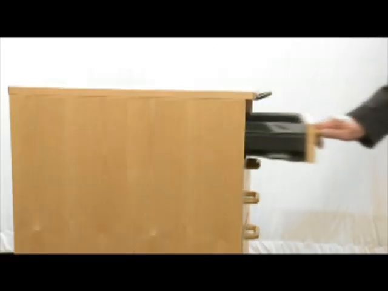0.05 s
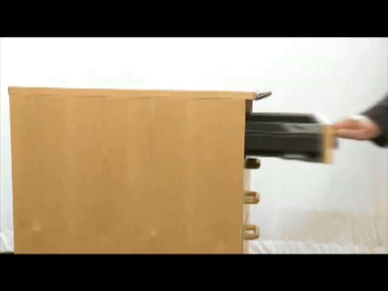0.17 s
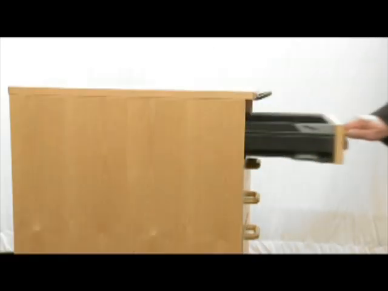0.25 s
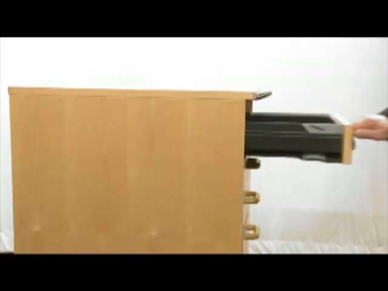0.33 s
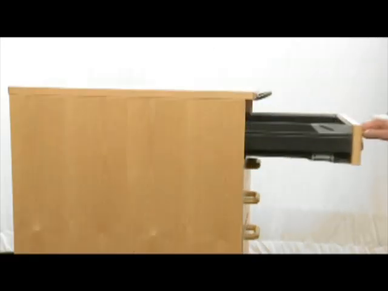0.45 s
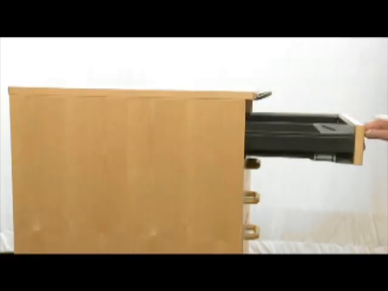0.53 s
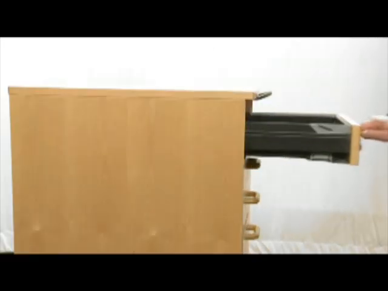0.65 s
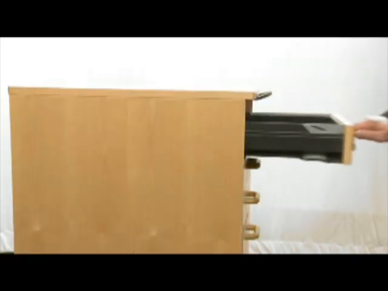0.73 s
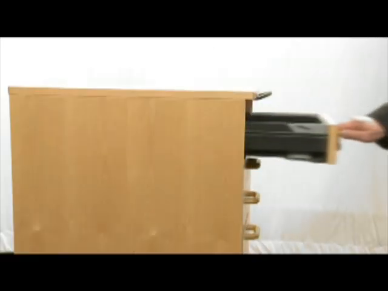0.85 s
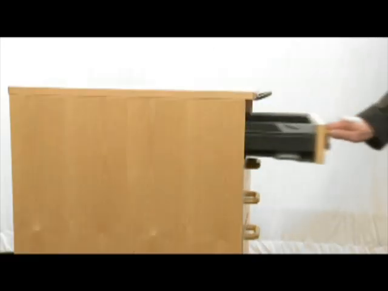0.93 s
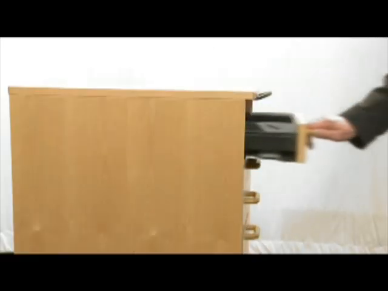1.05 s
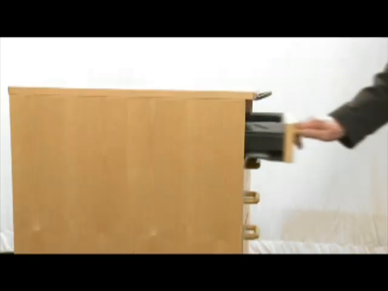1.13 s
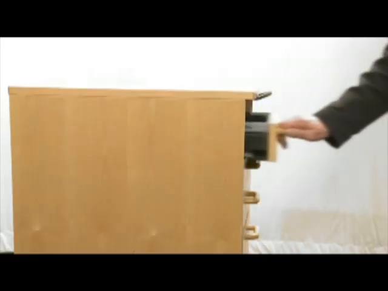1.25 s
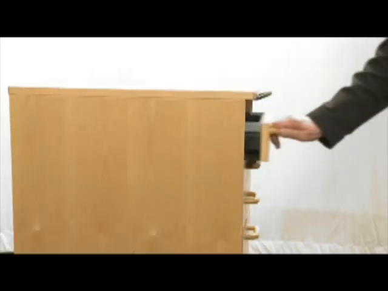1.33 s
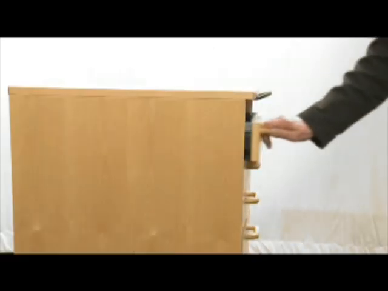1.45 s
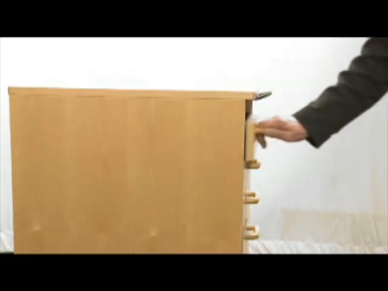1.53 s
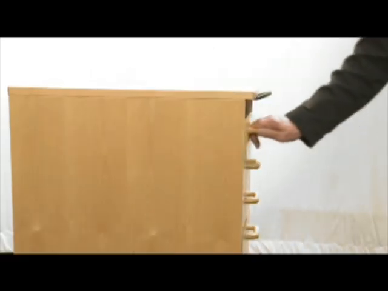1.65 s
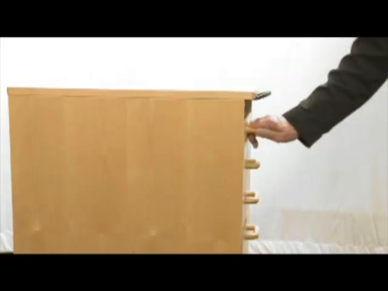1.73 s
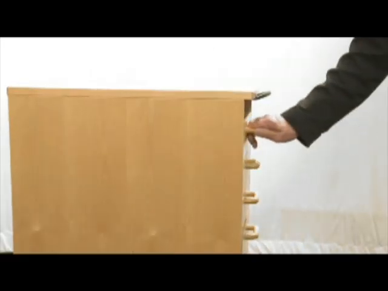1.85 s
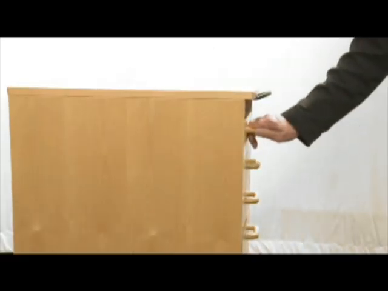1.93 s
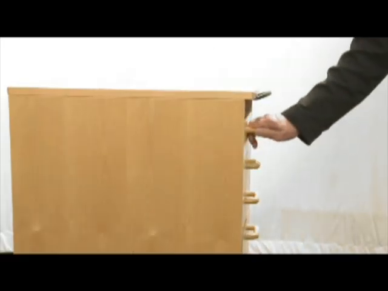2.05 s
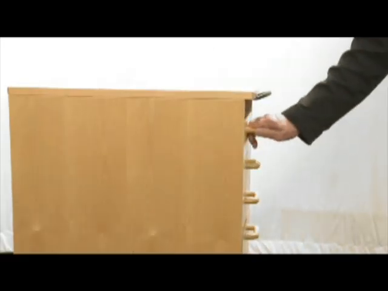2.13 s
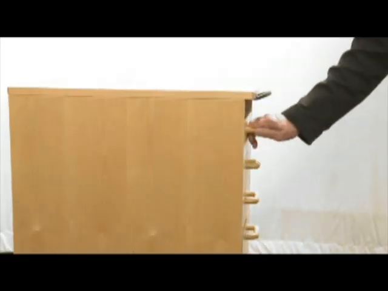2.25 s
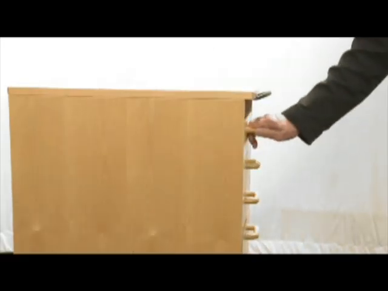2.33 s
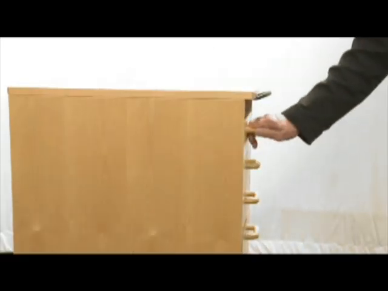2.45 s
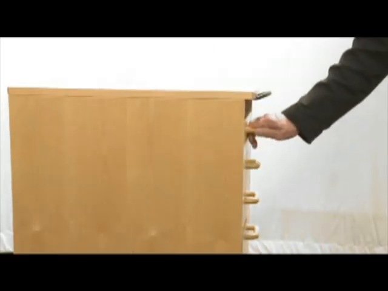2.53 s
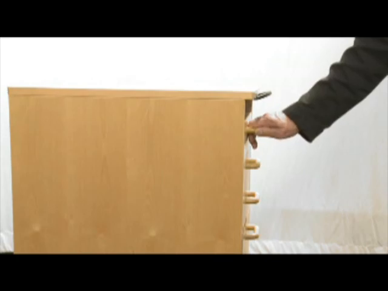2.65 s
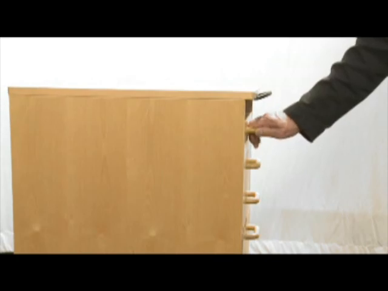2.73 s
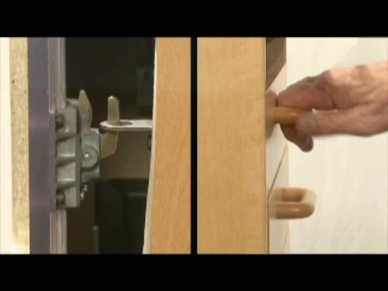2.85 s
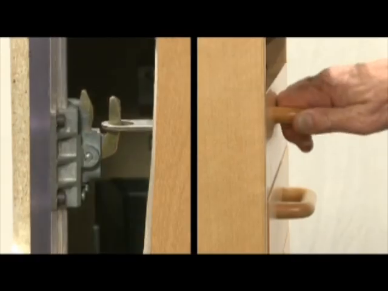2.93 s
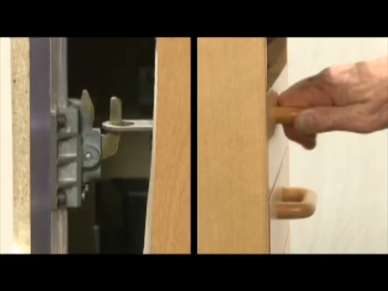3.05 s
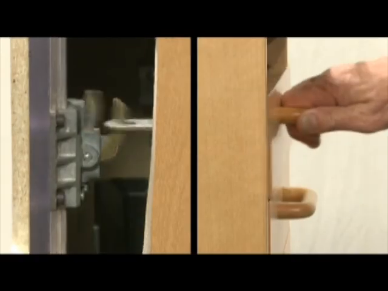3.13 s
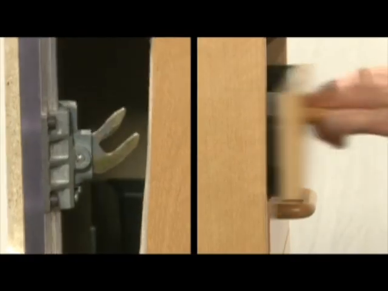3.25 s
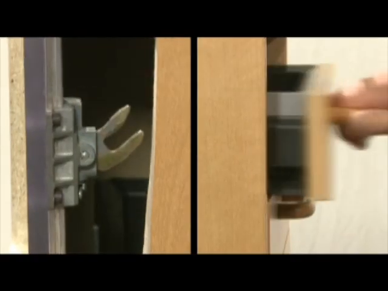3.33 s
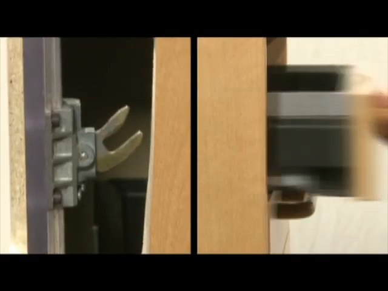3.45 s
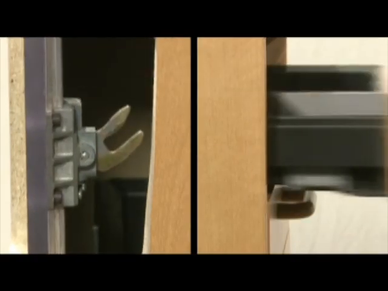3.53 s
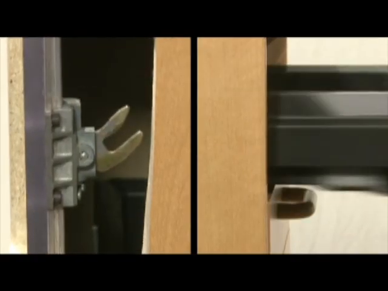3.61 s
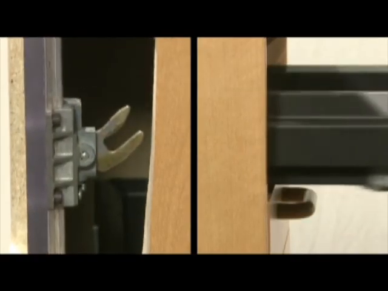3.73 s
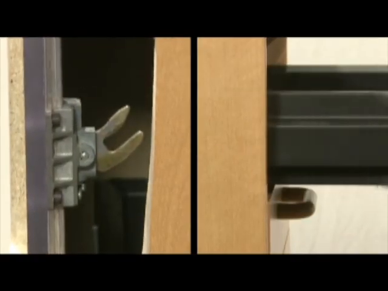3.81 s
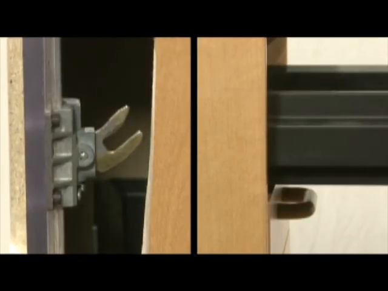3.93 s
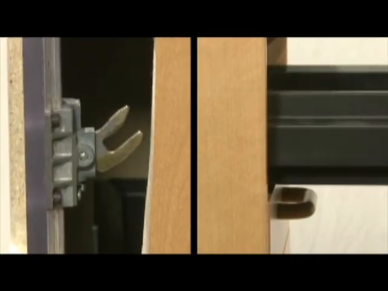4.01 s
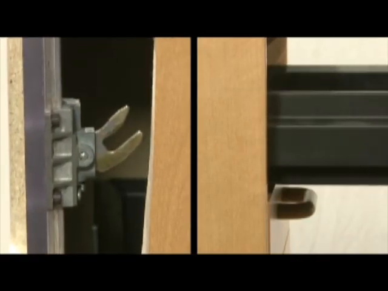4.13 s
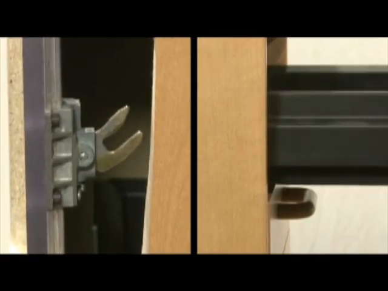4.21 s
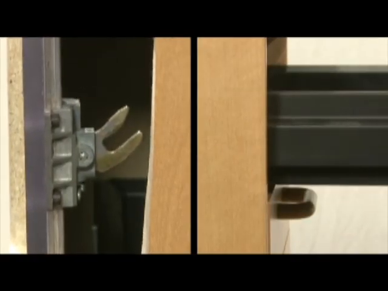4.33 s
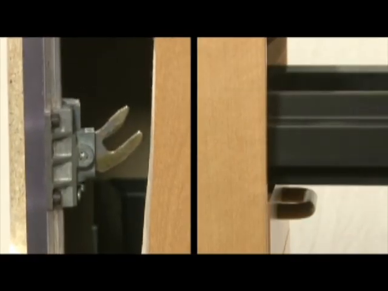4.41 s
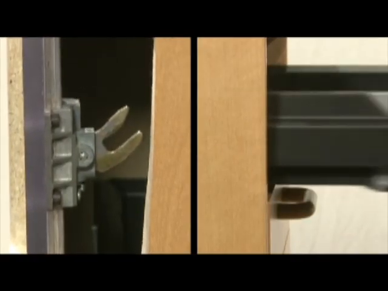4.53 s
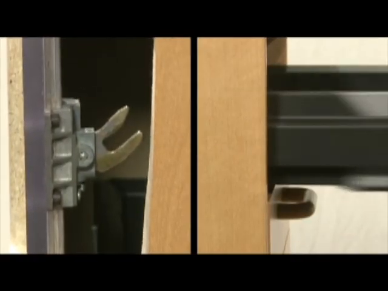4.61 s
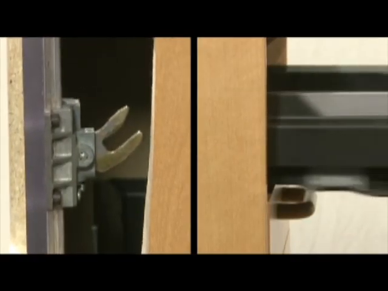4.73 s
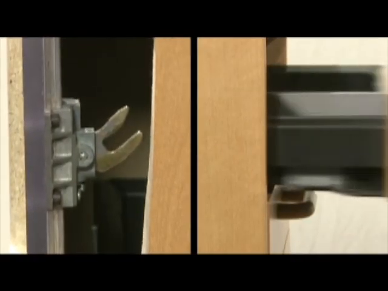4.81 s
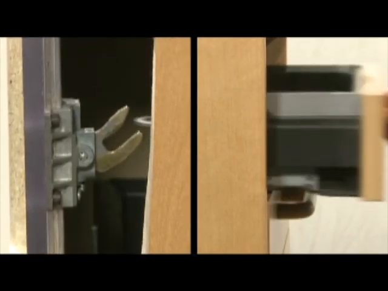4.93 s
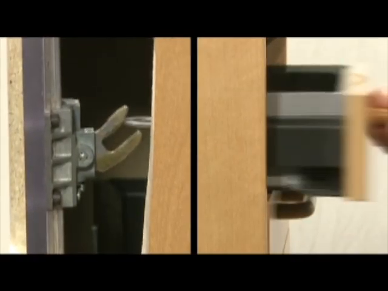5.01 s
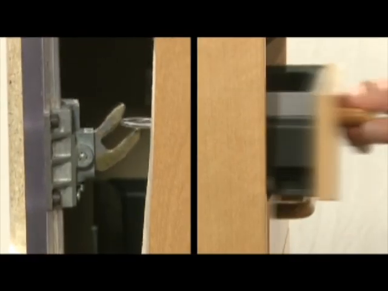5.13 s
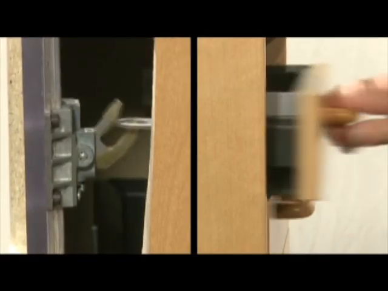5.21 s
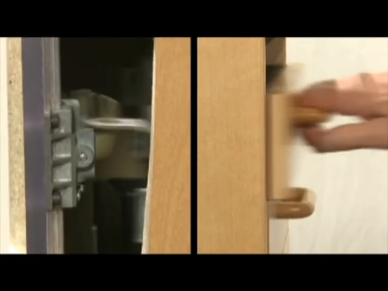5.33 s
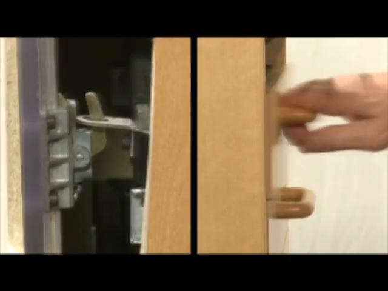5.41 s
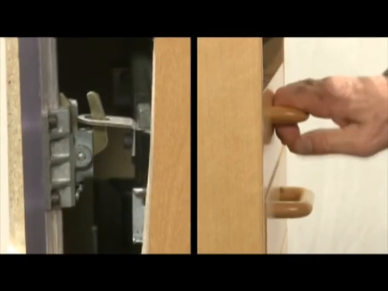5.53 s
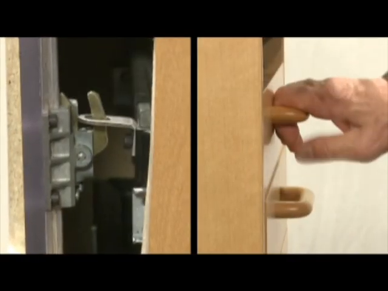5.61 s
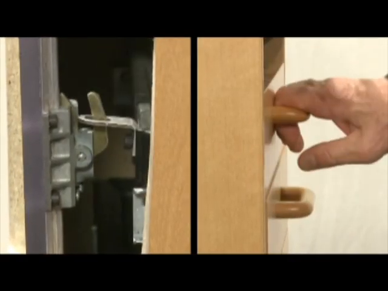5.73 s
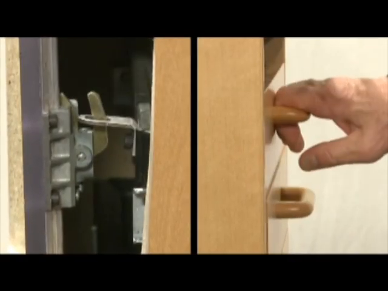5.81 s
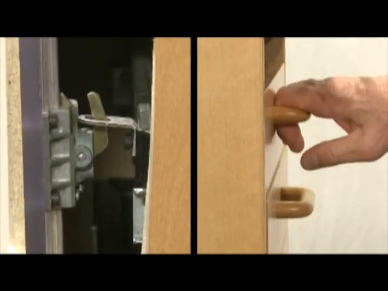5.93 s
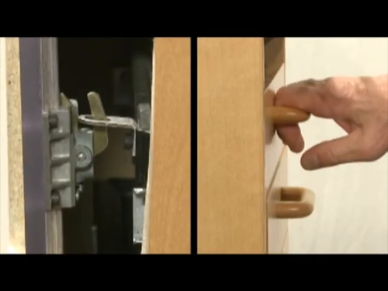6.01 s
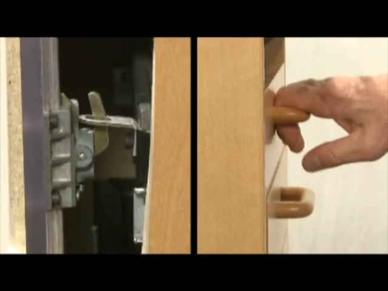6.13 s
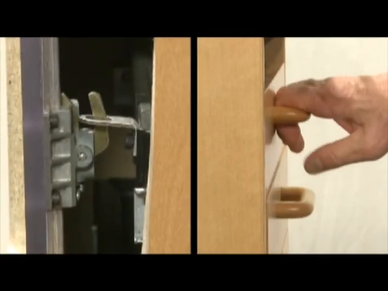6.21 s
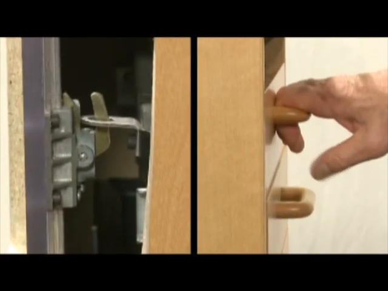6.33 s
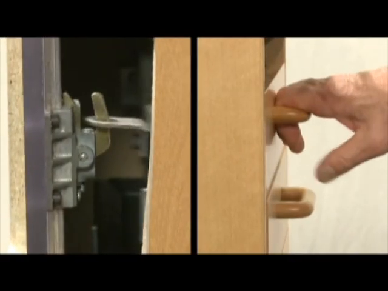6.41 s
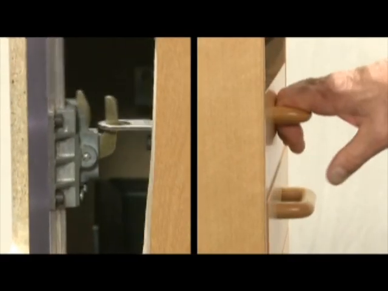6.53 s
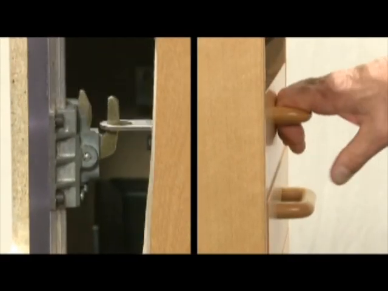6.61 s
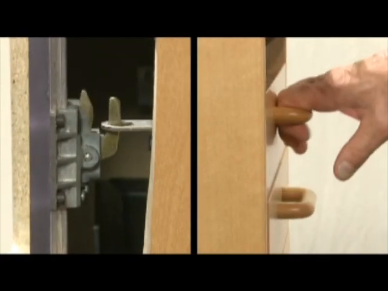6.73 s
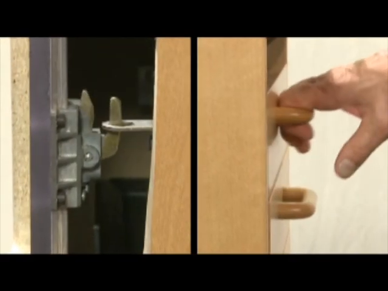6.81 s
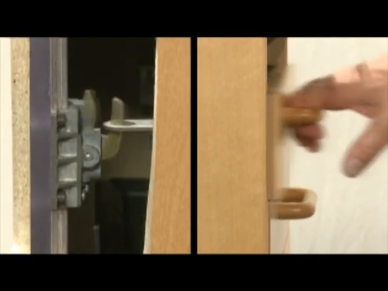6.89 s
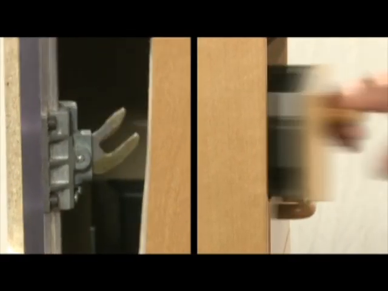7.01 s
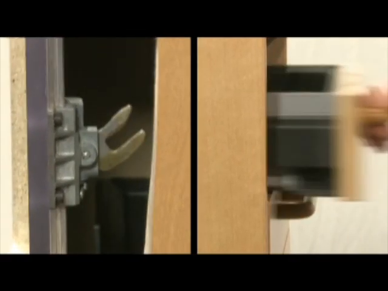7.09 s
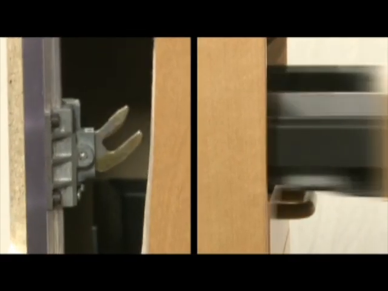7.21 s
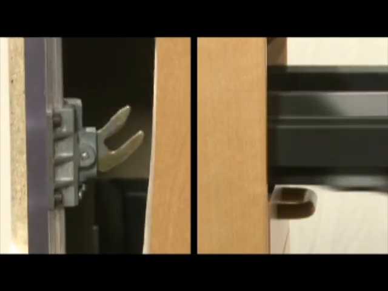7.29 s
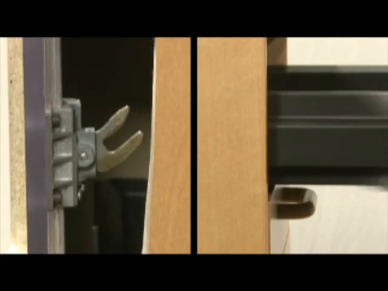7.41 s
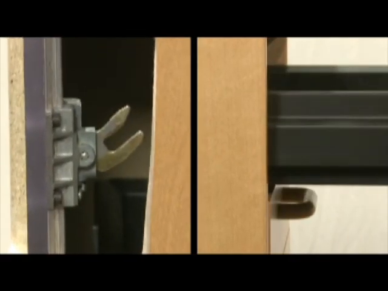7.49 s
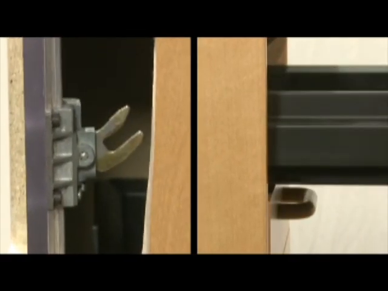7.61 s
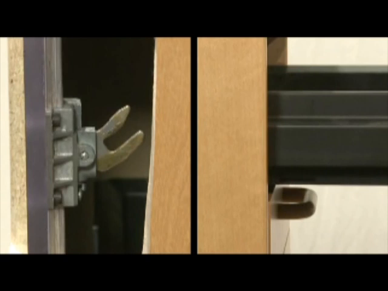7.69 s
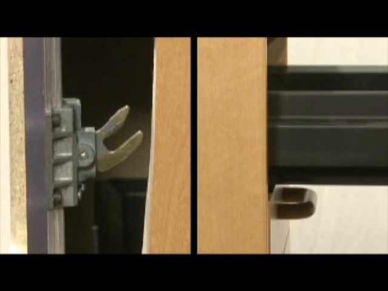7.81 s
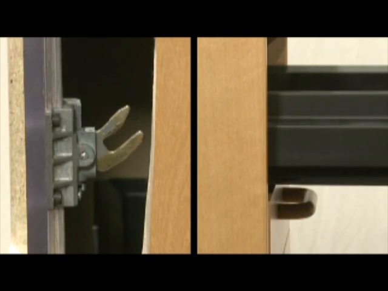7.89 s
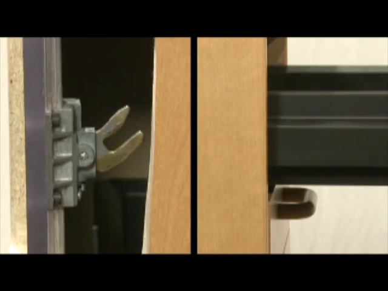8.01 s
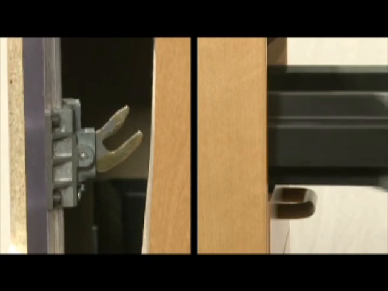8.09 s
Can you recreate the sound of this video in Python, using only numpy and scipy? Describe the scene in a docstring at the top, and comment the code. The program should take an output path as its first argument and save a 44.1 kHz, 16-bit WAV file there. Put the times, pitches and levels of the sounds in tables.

```python
"""A small dry room with a wooden office cabinet, whose top drawer is pulled out and pushed home again and again.
Rollers rumble along steel runners (shaped noise) and ring the drawer and case (resonators); a dry one squeaks.
Runners click where they take over, and latch and stops knock the case: noise bursts and decaying tones.
The sprung fork clacks, loose latch parts chatter, and the latch spring ticks ever more weakly.
A hand murmurs through the case, over low room rumble and a smooth hiss."""
import sys
import numpy as np
from scipy import signal
from scipy.fft import rfft, irfft, next_fast_len
from scipy.io import wavfile
from scipy.ndimage import uniform_filter1d

SR = 44100
rng = np.random.default_rng(int(sys.argv[2]) if len(sys.argv) > 2 else 0)


def dump_mix(stems):
    """Bounce the given channels to the path in sys.argv[1] as a 16-bit WAV at rate SR."""
    frames = np.atleast_2d(stems).T  # one column per channel
    limited = np.clip(frames, -1, 1)  # hard clip at full scale
    pcm = np.round(limited * 32767).astype(np.int16)
    wavfile.write(sys.argv[1], SR, pcm)


N = 359415

TIME = np.arange(N) / SR  # seconds
AGE = np.arange(int(.45 * SR)) / SR  # seconds since an impact
BANDS = 40 * 2 ** (np.arange(27) / 3)  # third-octave centres in Hz
MODE_SWAY_DB, MODE_SWAY_PER_S = 3.5, 7  # rolling drives each mode unevenly: depth, chance values a second
TICK_SCATTER_DB = 3  # spread of level among spring ticks and among rattle taps


def undb(db):
    """Decibels to gain."""
    return 10 ** (np.asarray(db) / 20)


def unit(x):
    """Scale to rms 1."""
    return x / np.sqrt(np.mean(x ** 2, axis=-1, keepdims=True))


def db_at(hz, points):
    """Read (Hz, dB) points on a log-frequency axis."""
    f, db = np.transpose(points)
    return np.interp(np.log(hz + 1e-9), np.log(f), db)


def colour(x, points):
    """Give a steady sound a spectrum."""
    size = next_fast_len(N)
    hz = np.arange(size // 2 + 1) * SR / size
    return irfft(rfft(x, size) * undb(db_at(hz, points)), size)[:N]


def band(x, lo_hz, hi_hz):
    """Band-pass."""
    sos = signal.butter(2, [lo_hz, min(hi_hz, .48 * SR)], "band", fs=SR, output="sos")
    return signal.sosfilt(sos, x)


def fade(t60):
    """Exponential ring-down that falls 60 dB in t60 seconds."""
    return np.exp(-np.log(1000) * AGE / t60)


def walk(rate):
    """Slow chance with a spread near 1: random values, rate a second, joined by straight lines."""
    knots = rng.standard_normal(4000)
    return np.interp(TIME * rate, np.arange(len(knots)), knots)


def gate(start, end, attack_s, release_s):
    """Fade in before start, hold, fade out after end."""
    return np.interp(TIME, [start - attack_s, start, end, end + release_s], [0, 1, 1, 0])


def add(out, s, x):
    """Mix x in at time s."""
    i = max(int(s * SR), 0)
    out[i:i + len(x)] += x[:N - i]


def modes(x, column):
    """The ring of each mode of drawer and case; each answers according to where it is driven."""
    # Resonances of drawer, case and latch. Each row: pitch in Hz, nominal width in Hz,
    # level in dB when rolled on (column 2), level in dB when struck (column 3).
    cabinet_modes = [(70.3, 4, 3.5, 7), (92, 13, 9.5, -5), (124.5, 5.3, 5, 1), (191.6, 9, 10, 9.5),
                     (250.8, 25, 9.5, 9.5), (351.9, 7.6, 12, 12.5), (370.1, 5.9, 11, -12),
                     (396.5, 33, 5.5, -3), (422, 3.4, -0.5, 10.5), (518.4, 7.3, 9, 6.5),
                     (572, 6.7, 9, -8.5), (622.4, 7.4, 6, 1.5), (740.4, 40, 2, 5), (816.4, 11, 8.5, -5),
                     (970, 8.8, 2.5, 2.5), (1080, 28, 0.5, 4.5), (1197, 10, 3.5, 1.5), (1311, 48, 1.5, 1),
                     (1465, 15, 5, -4), (1600, 15, -9.5, -0.5), (1652, 25, -2.5, -2), (1863, 20, -9, 4),
                     (1964, 30, 0, -9.5), (2470, 220, -8, -4), (2810, 9.3, -5.5, -13), (3510, 24, 0, -19),
                     (4480, 60, -19.5, 1), (8790, 77, -6.5, 6.5), (10820, 330, -10.5, 4)]
    highest_q = 55  # no mode rings sharper than this
    rings = []
    for row in cabinet_modes:
        hz, width_hz = row[:2]
        b, a = signal.iirpeak(hz, min(hz / width_hz, highest_q), fs=SR)
        rings.append(undb(row[column]) * signal.lfilter(b, a, x))
    return rings


def cabinet(x, column):
    """Drawer and case pass a vibration on and ring with it."""
    return x + sum(modes(x, column))


def resonate(x, hz, width_hz):
    """A resonance whose centre moves: shift it to 0 Hz, smooth, and shift it back."""
    turn = np.exp(2j * np.pi * np.cumsum(hz) / SR)
    smooth = signal.lfilter([1], [1, -np.exp(-np.pi * width_hz / SR)], x / turn)
    return unit(np.real(turn * smooth))


def ripple():
    """Chance peaks and notches, as (Hz, dB), where the many upper modes of the panels add or cancel."""
    hz = np.geomspace(700, 16000, 190)
    spread_db = np.interp(hz, [700, 1500, 2500, 6000], [1.2, 3, 4.5, 4])
    chance = np.clip(rng.standard_normal(len(hz)), -2, 1.3)
    # a peak takes its strength from its neighbours
    return np.transpose([hz, spread_db * (chance - uniform_filter1d(chance, size=7))])


def dense_modes(peaks):
    """Third-octave bands of noise that stand for the countless overlapping modes of the panels."""
    size = 2 ** 17
    hz = np.arange(size // 2 + 1) * SR / size + 1e-9
    thirds = 3 * np.log2(hz / BANDS[:, None])  # distance from each band's centre
    spectrum = rfft(rng.standard_normal(size)) * undb(db_at(hz, peaks))
    bands = unit(irfft(spectrum * np.maximum(1 - np.abs(thirds), 0)))
    # each band holds its power, so equal blows are about equally loud
    return bands / np.sqrt(uniform_filter1d(bands ** 2, size=1024, axis=1))


def blow(panels, band_db, t60, push_s, bass_slope, room_db, room_t60):
    """One impact spreads through the panels; lows ring longer (t60 holds at 1 kHz) and the room adds a faint tail."""
    i = rng.integers(panels.shape[1] - len(AGE))
    ring = fade(t60 * (1000 / BANDS[:, None]) ** bass_slope) + undb(room_db) * fade(room_t60)
    rise = np.minimum(AGE / (push_s + 1 / BANDS[:, None]), 1)  # each band needs a cycle more to build up
    return undb(band_db) @ (panels[:, i:i + len(AGE)] * ring * rise)


def air():
    """Still air of the room and microphone hiss: noise with a low rumble under a smooth top."""
    # Spectrum of the air. Each row: pitch in Hz, relative level in dB.
    air_colour = [(20, -0.5), (55, 4.5), (100, -17), (220, -15), (500, -26.5), (1000, -42), (3000, -51),
                  (6000, -33.5), (15000, -40)]
    return unit(colour(rng.standard_normal(N), air_colour)) * undb(-67.5)


def travel_gains():
    """Gains of rumble, boom and grit: all grow with speed, and boom and grit weaken as the drawer leaves the case."""
    # Rolling level, which follows the drawer's speed; one curve per travel.
    # Each row of a curve: time in seconds, level in dB.
    slides = [
        [(0, -48), (.1, -53), (.185, -48), (.28, -55), (.34, -54.5), (.49, -61.5), (.6, -78.5)],
        [(.68, -55), (.82, -54), (.95, -51), (1.05, -52), (1.22, -54.5), (1.39, -63), (1.56, -60.5),
         (1.66, -64), (1.73, -66)],
        [(2.9, -54.5), (3.025, -53.5)],
        [(3.135, -74), (3.17, -48), (3.33, -55), (3.55, -52.5), (3.75, -48), (3.81, -53), (3.86, -63.5),
         (3.92, -66), (3.96, -65)],
        [(3.977, -49), (4.05, -51.5), (4.12, -49.5), (4.24, -57), (4.33, -57.5), (4.6, -66), (4.98, -69),
         (5.18, -84), (5.25, -67), (5.35, -61.5)],
        [(6.93, -56.5), (7.04, -49), (7.19, -54.5), (7.25, -63.5), (7.43, -54), (7.56, -51), (7.68, -55),
         (7.73, -70.5), (7.79, -76.5)],
        [(7.8, -69), (7.84, -48.5), (7.92, -48.5), (8.02, -50.5), (8.14, -52)],
    ]
    # The same travels, in order. Each row: opening at the start and at the end (0 shut, 1 fully out),
    # boom in dB and grit in dB, both for a shut drawer rolling at the cruise level.
    travels = [(0.17, 0.73, -57, -57), (0.33, 0.28, -57.5, -56.5), (0.54, 0.18, -64, -53.5),
               (0.19, 0.92, -48.5, -49), (0.84, 0, -49, -49.5), (0, 0.45, -50, -54),
               (0.79, 0.7, -54.5, -50)]
    cruise_db = -50
    boom_slope, grit_slope = 0.53, 1.234  # dB gained for each dB of rolling
    boom_open_db, grit_open_db = -7.5, -14.5  # a drawer that is fully out drives the case less
    rumble, boom, grit = np.zeros((3, N))
    for curve, (open_from, open_to, boom_db, grit_db) in zip(slides, travels):
        s, db = np.transpose(curve)
        rolling_db = np.interp(TIME, s, db)
        effort_db = rolling_db - cruise_db
        opening = np.interp(TIME, [s[0], s[-1]], [open_from, open_to])
        rolling = gate(s[0], s[-1], attack_s=0.021, release_s=.015)
        booming = gate(s[0], s[-1], attack_s=0.0093, release_s=0.2)
        rumble += rolling * undb(rolling_db)
        boom += booming * undb(boom_db + boom_slope * effort_db + boom_open_db * opening)
        grit += rolling * undb(grit_db + grit_slope * effort_db + grit_open_db * opening)
    return rumble, boom, grit


def overhang(bumps):
    """The overhanging drawer rings at pitches that depend on how it is held and creep as it travels."""
    # Resonances that swell and glide. Each row: start in seconds, end in seconds,
    # first pitch in Hz, last pitch in Hz, level in dB ahead of sway and rumble gain.
    glides = [(0, .4, 632, 625, -8), (0, .16, 1045, 1075, -10), (.1, .45, 375, 355, -2),
              (.75, 1.35, 620, 612, -7), (.7, 1.4, 820, 845, -12), (.88, 1.02, 385, 350, -1),
              (.85, 1.2, 270, 255, -5), (1.1, 1.4, 430, 400, -3), (3.66, 3.87, 380, 350, 0),
              (3.25, 3.68, 775, 755, -3), (3.62, 3.83, 770, 815, -6), (3.4, 3.85, 1475, 1515, -13),
              (4.0, 4.65, 565, 545, -8), (4.0, 4.24, 820, 805, -6), (4.4, 5.0, 205, 165, 0),
              (7.05, 7.23, 785, 760, -4), (7.3, 7.7, 755, 785, -8), (7.1, 7.7, 1070, 1095, -14),
              (7.48, 7.72, 350, 365, 0), (7.5, 7.68, 630, 620, -8), (7.86, 7.98, 365, 345, -2),
              (7.98, 8.14, 585, 535, -5)]
    width_hz, drift = 26, .015  # drift is a share of the pitch
    out = np.zeros(N)
    for start, end, from_hz, to_hz, db in glides:
        x = bumps[int(start * SR):int(end * SR)]
        swell = signal.windows.tukey(len(x), .4)
        swell *= undb(MODE_SWAY_DB * np.clip(walk(MODE_SWAY_PER_S)[:len(x)], -1.5, .6))
        hz = np.linspace(from_hz, to_hz, len(x)) * (1 + drift * walk(MODE_SWAY_PER_S)[:len(x)])
        add(out, start, undb(db) * swell * resonate(x, hz, width_hz))
    return out


def rollers(peaks):
    """Rollers bump over tiny flaws of the track; load and speed share the sound among boom, rumble and grit."""
    # Colour of the rollers on their track. Each row: pitch in Hz, level in dB.
    track_colour = [(40, -16.5), (100, -7), (160, -3.5), (300, 3), (480, -4.5), (750, -3), (1400, -9.5),
                    (2100, -16), (3100, -24), (4400, -22.5), (6000, -29.5), (10200, -36.5), (12500, -77),
                    (16000, -61)]
    flaws_db = 2.5 * rng.exponential(size=N) + 1.8 * walk(70)
    bumps = colour(rng.standard_normal(N) * undb(flaws_db), track_colour)
    # as the contact points travel along the rails, modes swell and fade and other upper modes take over
    shift = .5 + .5 * np.tanh(2 * walk(4))
    drive = shift * colour(bumps, peaks) + (1 - shift) * colour(bumps, ripple())
    track = drive.copy()
    for mode in modes(drive, column=2):
        track += mode * undb(MODE_SWAY_DB * np.clip(walk(MODE_SWAY_PER_S), -2, 1))
    rumble_gain, boom_gain, grit_gain = travel_gains()
    rumble = (unit(band(track, 282, 756)) * undb(-1.5) + overhang(bumps)) * rumble_gain
    boom = unit(band(track, 66, 186)) * boom_gain
    grit = unit(band(track, 1147, 15000)) * grit_gain
    return rumble - boom - grit


def squeals():
    """A dry roller sticks and slips, so its rail squeaks in rough, wavering bands of noise."""
    # Brief squeaks. Each row: start in seconds, length in seconds,
    # first pitch in Hz, last pitch in Hz, level in dB.
    squeaks = [(.205, .125, 4295, 4285, -71.5), (.205, .125, 2225, 2215, -70), (.24, .09, 2045, 2035, -70),
               (1.06, .11, 5100, 5060, -79)]
    waver, waver_per_s = .014, 90  # share of the pitch, chance values a second
    out = np.zeros(N)
    for s, length, from_hz, to_hz, db in squeaks:
        size = int(length * SR)
        hz = np.linspace(from_hz, to_hz, size) * (1 + waver * walk(waver_per_s)[:size])
        swell = signal.windows.tukey(size, .4)
        add(out, s, undb(db) * swell * resonate(rng.standard_normal(size), hz, width_hz=150))
    return out


def clicks(panels):
    """Steel meets steel lightly and taps the case; where it is struck decides which of its modes sing on."""
    # Light clicks of runners and catch. Each row: start in seconds, level in dB, treble in dB re level,
    # ring in dB re level, ring centre in Hz, share of the free ring time.
    click_hits = [(0.615, -55, -7.5, -11.5, 3700, 1), (0.681, -45.5, -20.5, -37, 3000, .5),
                  (1.459, -57, -7, -15, 6500, 1), (1.535, -53, -21, -34, 3000, .5),
                  (1.643, -56, -23, -18, 2500, .5), (1.669, -62, -9, -16, 3370, 0.45),
                  (1.759, -48, -4, -18, 4940, 1), (1.923, -57.5, -12, -28, 2400, 0.19),
                  (2.582, -61, -12, -21, 3000, 0.39), (2.633, -60.5, -7, -35, 3800, .5),
                  (2.841, -59, -12, -15, 2960, 0.44), (2.918, -39.5, -18, -28, 3020, 0.39),
                  (3.914, -52.5, -13.5, -10.5, 3040, 0.82), (4.859, -53, -24, -8, 3160, 0.31),
                  (5.111, -62.5, 0, -28, 6000, .5), (5.312, -52.5, -20, -16, 2900, 0.25),
                  (5.366, -61, -5, -21, 3000, .5), (5.446, -56, -9, -5, 3000, 0.22),
                  (5.594, -60, -5.5, 1.5, 3210, 0.37), (5.608, -66.5, -2.5, 8, 2000, 0.76),
                  (6.352, -54.5, -40, -26.5, 2460, 0.33), (6.534, -55.5, -9.5, -9, 1880, 0.34),
                  (6.606, -69.5, -1.5, -18, 2400, 0.46), (6.905, -48, -42, -19.5, 1980, .5),
                  (7.791, -55, -14, -3.5, 4100, 0.69)]
    # Colour shared by the taps. Each row: pitch in Hz, level in dB.
    click_colour = [(60, -18), (200, -26), (800, -10.5), (1500, -18.5), (3500, -8), (7000, -0.5),
                    (11000, -28), (15000, -48)]
    # Modes of the steel fittings. Each row: pitch in Hz, level in dB, free ring time (t60) in seconds.
    steel_modes = [(1464, -1, .45), (1701, -5, .3), (2256, -5, .14), (2550, -1, .34), (2990, -10, .2),
                   (3260, -4, .25), (3335, -7, .15), (3870, -4, .22), (5483, -7, .15), (6106, -2, .25),
                   (6460, -6, .2), (7629, -2, .3), (9536, -6, .2)]
    taps, rings = np.zeros((2, N))
    for s, db, treble_db, ring_db, ring_hz, free in click_hits:
        tilt_db = db_at(BANDS, [(1500, 0.0021), (5500, treble_db)])
        band_db = db + db_at(BANDS, click_colour) + tilt_db
        tap = blow(panels, band_db, t60=.085, push_s=0.0098, bass_slope=.3, room_db=-24, room_t60=.25)
        add(taps, s, tap)
        for hz, mode_db, t60 in steel_modes:
            reach = np.exp(-(np.log2(hz / ring_hz) / 0.5) ** 2)
            # the fittings come in near-equal pairs whose tones beat
            pair_hz = hz * (1 + .005 * rng.standard_normal((2, 1)))
            tone = np.array([.75, .4]) @ np.sin(2 * np.pi * pair_hz * AGE)
            add(rings, s, undb(db + ring_db + mode_db) * reach * fade(t60 * free) * tone)
    return cabinet(taps, column=3) + rings


def knocks(panels):
    """Blows shove the case into ringing: a heavy one thumps, a soft one sounds of wood, a hard one snaps."""
    # Blows of latch, rollers and end stops; a harder contact has a higher pitch.
    # Each row: start in seconds, level in dB, contact pitch in Hz, thump in dB, shove in dB.
    knock_hits = [(1.432, -32, 800, -51, -58), (1.445, -41, 1200, -58, -52), (1.579, -30, 736, -41, -44),
                  (1.595, -45, 450, -43, -39), (1.613, -33, 347, -44, -39), (1.652, -35, 505, -50, -47),
                  (1.771, -21.5, 690, -43, -44.5), (1.776, -36, 4300, -65, -82),
                  (1.789, -27.5, 520, -39.5, -56), (1.923, -67, 990, -74, -58), (2.635, -51, 700, -62, -69),
                  (2.896, -40, 804, -48, -44), (2.916, -49, 900, -51, -66), (2.985, -51, 900, -53, -73),
                  (3.132, -39.5, 820, -50, -64), (3.158, -29, 790, -78, -64), (3.169, -24, 1240, -49, -63),
                  (3.189, -17.5, 4030, -58, -63), (3.194, -17, 1070, -64, -69),
                  (3.216, -26, 1200, -49, -60.5), (3.245, -30.5, 890, -32.5, -59),
                  (3.919, -42, 900, -58, -81), (3.974, -32, 1200, -45, -39),
                  (4.859, -39.5, 910, -69.5, -62.5), (5.019, -32.5, 2400, -41, -73.5),
                  (5.031, -32.5, 766, -50, -51), (5.049, -38, 1150, -44.5, -51),
                  (5.223, -35.5, 1180, -66, -62.5), (5.384, -24, 3900, -32.5, -63),
                  (5.393, -21.5, 930, -36.5, -43), (5.406, -29.5, 640, -36.5, -42),
                  (5.429, -42.5, 493, -36.5, -47), (6.442, -31.5, 2920, -46.5, -61),
                  (6.453, -28, 750, -44.5, -57.5), (6.463, -29.5, 870, -52.5, -58),
                  (6.927, -33, 880, -36.5, -58), (6.94, -19.5, 1320, -59, -60),
                  (6.949, -25, 2340, -47, -60), (6.952, -26, 650, -56, -59), (6.959, -18.5, 4660, -64, -66),
                  (6.961, -15, 1400, -48.5, -64), (7.03, -28, 980, -65, -40), (7.837, -30, 990, -46, -75)]
    # Colour shared by the blows. Each row: pitch in Hz, level in dB.
    knock_colour = [(40, -29.5), (75, -21), (160, -16), (400, -24), (1000, -24.5), (2000, -22),
                    (3200, -21.5), (4500, -24.5), (7000, -26.5), (10500, -17), (15000, -26.5)]
    below_db, above_db = 5.5, 9.5  # fall per octave on each side of the contact pitch
    push_cycles = 7.2  # build-up in cycles of the contact pitch, ahead of each band's own cycle
    shove_s = 0.00065  # rise of the force with which a blow shoves the case
    out, force = np.zeros((2, N))
    bass = db_at(BANDS, [(110, 1), (420, 0.053)])  # share of each band that the thump governs
    shove = AGE / shove_s * np.exp(-AGE / shove_s)
    shove *= SR / (2 * np.pi * 50) / shove.sum()  # rings a mode 50 Hz wide at about full scale
    for s, db, contact_hz, thump_db, shove_db in knock_hits:
        octaves = np.log2(BANDS / contact_hz)
        contact_db = db + np.minimum(below_db * octaves, -above_db * octaves)
        band_db = bass * thump_db + (1 - bass) * contact_db + db_at(BANDS, knock_colour)
        knock = blow(panels, band_db, t60=0.14, push_s=push_cycles / contact_hz,
                     bass_slope=0.28, room_db=-33, room_t60=0.22)
        add(out, s, knock)
        add(force, s, undb(shove_db) * shove)
    # neighbouring modes swing in opposite directions
    body = sum((-1) ** k * mode for k, mode in enumerate(modes(force, column=3)))
    return cabinet(out, column=3) + body


def rattles(panels):
    """Loose latch parts chatter as the catch rubs along: a quick, uneven run of small taps on one spot."""
    # Runs of chatter. Each row: start in seconds, length in seconds, mean tap level in dB.
    runs = [(1.434, .045, -57), (1.536, 0.03, -66.5), (1.647, 0.05, -60.5), (2.104, 0.022, -68),
            (2.909, 0.1, -55.5), (4.875, 0.11, -66), (5.317, 0.042, -55), (5.45, 0.054, -58),
            (6.584, 0.032, -63)]
    # Colour of a tap. Each row: pitch in Hz, level in dB.
    rattle_colour = [(200, -24.5), (700, -11.5), (1500, -10), (2500, -17.5), (4500, -20), (9000, -25),
                     (15000, -60)]
    gap_s, jitter_s = .008, .002
    out = np.zeros(N)
    for start, length, level_db in runs:
        tap = blow(panels, level_db + db_at(BANDS, rattle_colour), t60=0.034, push_s=0.0011,
                   bass_slope=0.13, room_db=-32, room_t60=0.31)
        chance = rng.standard_normal((40, 2))
        for age, (late, strong) in zip(np.arange(0, length, gap_s), chance):
            add(out, start + age + jitter_s * late, undb(TICK_SCATTER_DB * strong) * tap)
    return out


def struck(part, hits, reach_octaves, contact_s):
    """A part rings with its own modes; each hit favours those near its centre pitch."""
    out = np.zeros(N)
    rise = np.minimum(AGE / contact_s, 1)
    tones = []
    for k, (hz, db, t60) in enumerate(part):
        sign = (-1) ** k  # neighbouring modes start in opposite directions
        tones.append(sign * undb(db) * rise * fade(t60) * np.sin(2 * np.pi * hz * AGE))
    mode_hz = np.array(part)[:, 0]
    for s, db, centre_hz in hits:
        reach = np.exp(-(np.log2(mode_hz / centre_hz) / reach_octaves) ** 2)
        add(out, s, undb(db) * reach @ np.array(tones))
    return out


def clacks():
    """The fork clacks against its pin and stops; the drawer answers with a hollow note when it is jolted."""
    # Modes of the fork latch, then of the jolted drawer.
    # Each row: pitch in Hz, level in dB, ring time (t60) in seconds.
    fork_modes = [(1104, 0.5, 0.09), (1240, 1.5, .07), (1335, 0.5, .07), (1400, 1.5, 0.032),
                  (1700, -11, .07), (1725, -7, .09), (2296, -1.5, .05), (2384, -3.5, 0.067),
                  (2960, -11, .08), (3210, -21.5, .1), (3864, -15.5, .06), (4320, -15.5, .08)]
    drawer_modes = [(366, 1, .1), (420, -0.5, 0.12), (534.4, -1, 0.041), (550, -4, 0.17),
                    (730, -5.5, 0.063), (770, -3.5, 0.068), (824, -4.5, .07), (1060, 2.5, 0.077)]
    # The fork meets its pin or stop, then the drawer is jolted against latch and stops.
    # Each row: start in seconds, level in dB, centre pitch in Hz.
    fork_hits = [(1.926, -69, 1600), (2.634, -78, 1900), (2.845, -69, 1300), (3.172, -42, 1390),
                 (3.194, -36, 1690), (5.019, -49, 2700), (5.050, -52, 1700), (5.384, -41.5, 2200),
                 (6.355, -65, 1150), (6.444, -51, 3000), (6.465, -45.5, 1100), (6.54, -67, 1800),
                 (6.608, -68, 1900), (6.906, -62, 1700), (6.943, -41, 1900), (6.962, -29.5, 1900)]
    jolts = [(1.582, -42, 586), (1.776, -39, 510), (2.897, -43, 660), (3.196, -41, 770), (5.034, -44, 650),
             (5.396, -44, 764), (5.407, -60, 480), (5.434, -45, 600), (6.464, -39.5, 410),
             (6.929, -37, 620), (6.963, -43, 600), (7.032, -36.5, 930), (7.036, -45, 400)]
    fork = struck(fork_modes, fork_hits, reach_octaves=1.0, contact_s=.0025)
    drawer = struck(drawer_modes, jolts, reach_octaves=0.38, contact_s=0.0035)
    return fork + drawer


def handling():
    """Dull, uneven rubbing of the hand, carried by the case: each grip sets in, holds and slowly eases."""
    # The hand loads the handle and the case murmurs with it.
    # Each row: time of full grip in seconds, hold in seconds, level in dB.
    hand_grips = [(1.872, 0.015, -54.5), (2.105, 0.059, -68.5), (2.599, 0.25, -61), (5.528, 0.23, -64.5),
                  (5.991, 0.66, -68.5), (6.536, 0.003, -53.5), (6.801, .1, -85)]
    # Colour of the rubbing. Each row: pitch in Hz, level in dB.
    hand_colour = [(40, -15), (85, 9.5), (200, -6.5), (400, -12), (700, -22.5), (1100, -27.5),
                   (1800, -54.5), (4000, -42.5)]
    attack_s, release_db_per_s = 0.038, 63.5
    rub = unit(cabinet(colour(rng.standard_normal(N), hand_colour), column=3))
    pressure_db = 3.5 * walk(18)
    grips = []
    for s, hold, db in hand_grips:
        onset = np.interp(TIME, [s - attack_s, s], [0, 1])
        grips.append(onset * undb(db - release_db_per_s * np.maximum(TIME - s - hold, 0)))
    return rub * undb(pressure_db) * np.max(grips, axis=0)  # the strongest grip is heard


def spring(panels):
    """The coils of the latch spring slip past each other in tiny bright ticks, once a swing and ever weaker."""
    # The spring swings after the latch has snapped.
    # Each row: first tick in seconds, length in seconds, swing period in seconds, first level in dB.
    swings = [(3.2375, .25, .0385, -48), (5.4765, .03, .039, -50.5), (7.048, .28, .0395, -47.5)]
    # Colour of a tick. Each row: pitch in Hz, level in dB.
    tick_colour = [(1000, -12), (4000, -22), (7000, -20.5), (10500, -10.5), (12000, -43), (15000, -41.5)]
    fade_db_per_s, jitter_s, tilt_db_per_octave = 29, .007, 3  # jitter and tilt are chance spreads
    out = np.zeros(N)
    for start, length, period, level_db in swings:
        for age in np.arange(0, length, period):
            late, strong, bright = rng.standard_normal(3)
            tilt_db = tilt_db_per_octave * bright * np.clip(np.log2(BANDS / 8000), -1.5, 1)
            db = level_db - fade_db_per_s * age + TICK_SCATTER_DB * strong
            tick = blow(panels, db + tilt_db + db_at(BANDS, tick_colour), t60=0.026, push_s=0.00069,
                        bass_slope=0.084, room_db=-24, room_t60=0.43)
            add(out, start + age + jitter_s * late, tick)
    return out


def scene():
    """All sources of the room, mixed together."""
    peaks = ripple()
    panels = dense_modes(peaks)
    rolling = rollers(peaks) + squeals()
    impacts = clicks(panels) + knocks(panels) + rattles(panels) + clacks() + spring(panels)
    return (air() + rolling + impacts + handling())[None]


def record(dry):
    """The recorder cuts the top with a steep low-pass at 15.8 kHz."""
    return signal.sosfilt(signal.ellip(8, .2, 70, 15800, fs=SR, output="sos"), dry)


dry = scene()
out = record(dry)
dump_mix(out)
```